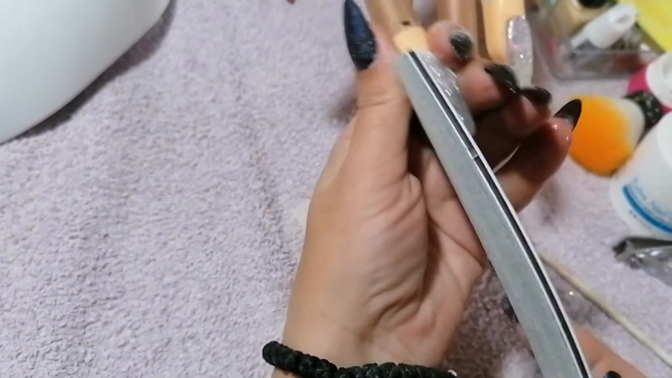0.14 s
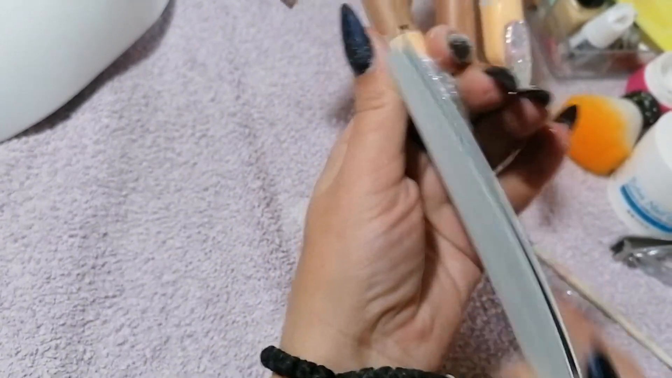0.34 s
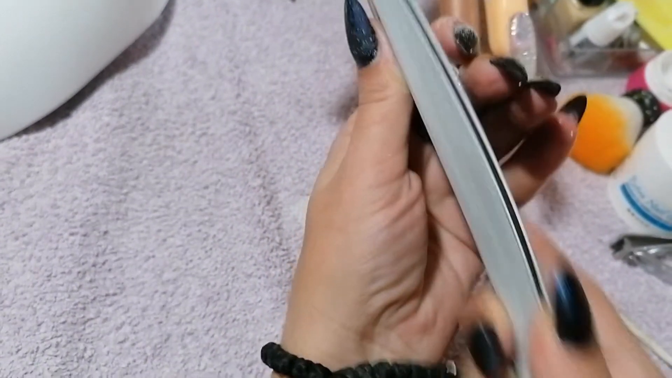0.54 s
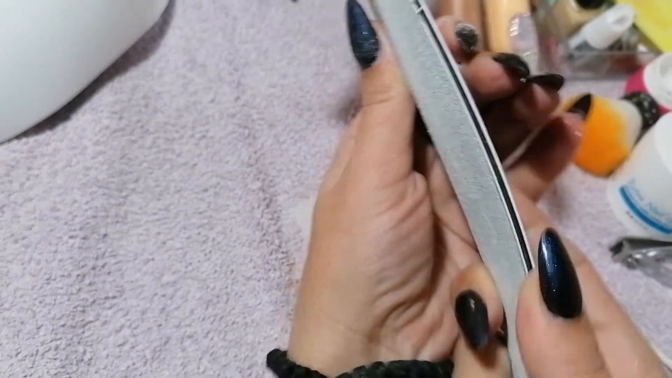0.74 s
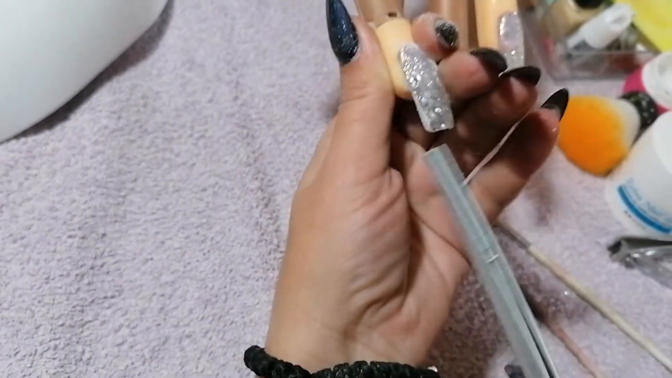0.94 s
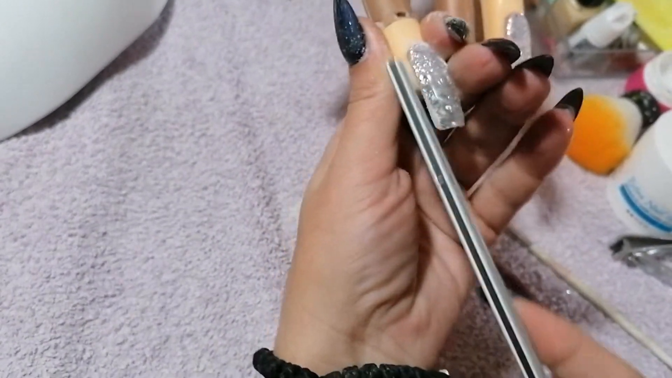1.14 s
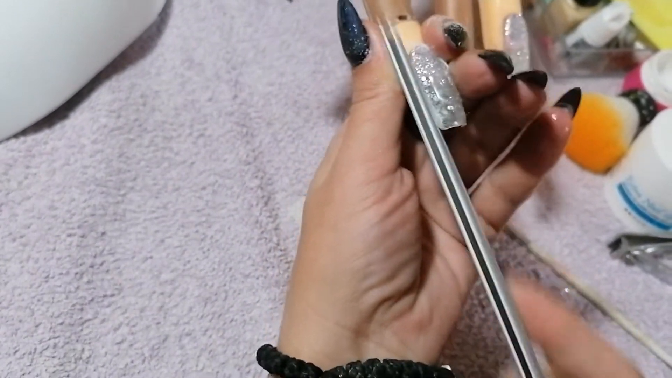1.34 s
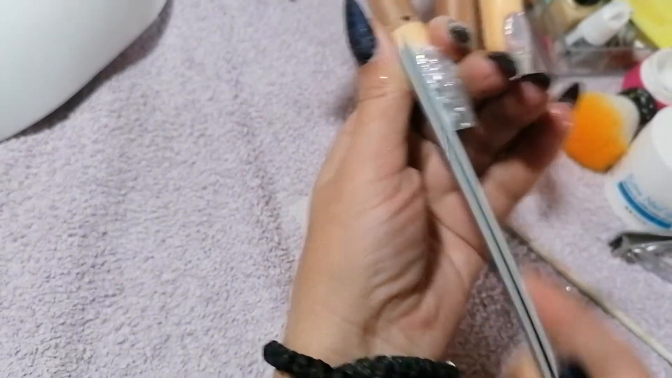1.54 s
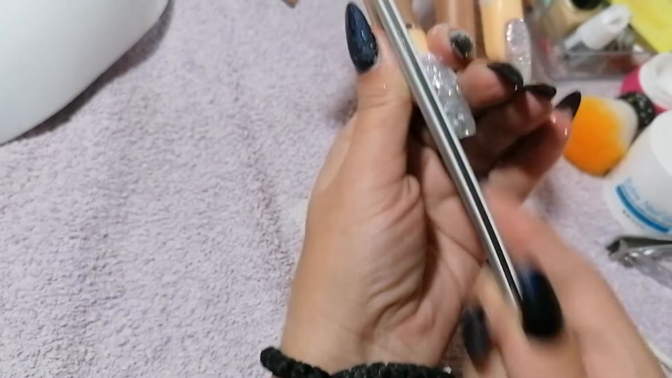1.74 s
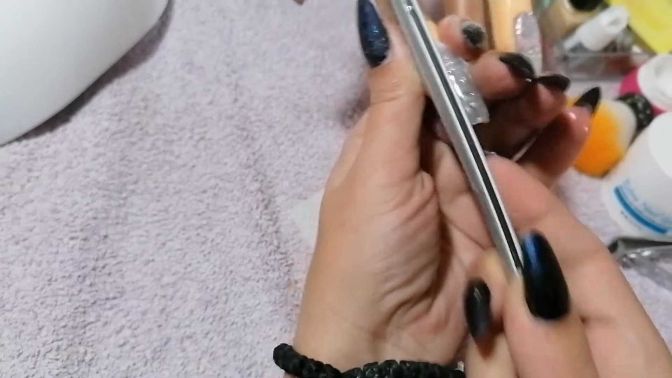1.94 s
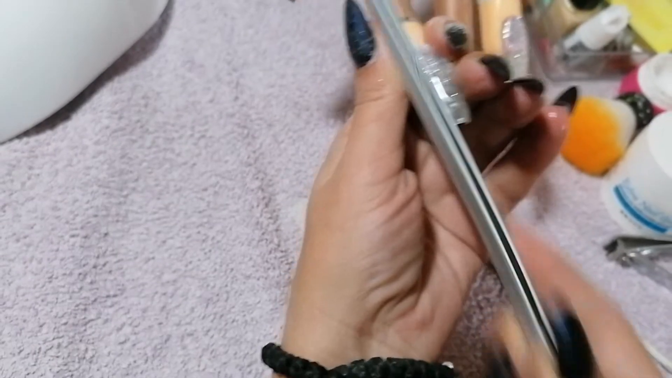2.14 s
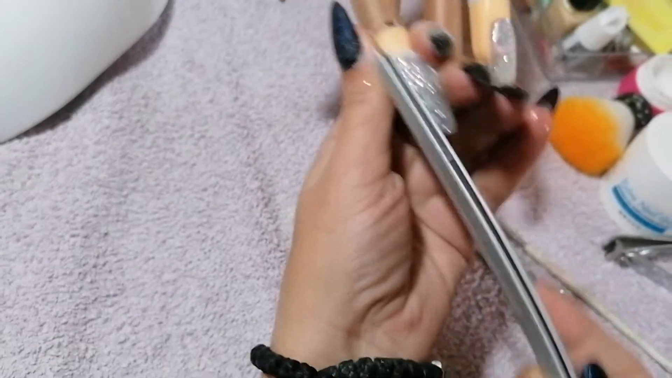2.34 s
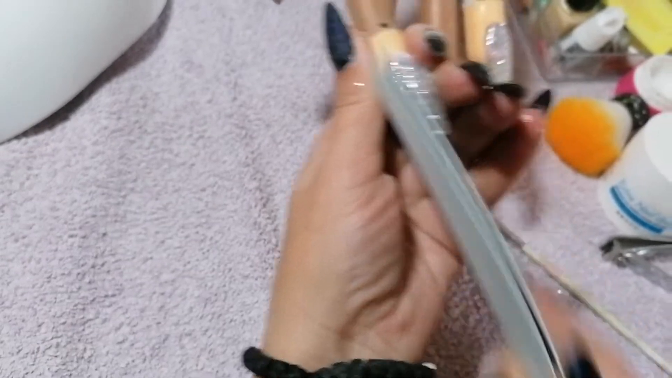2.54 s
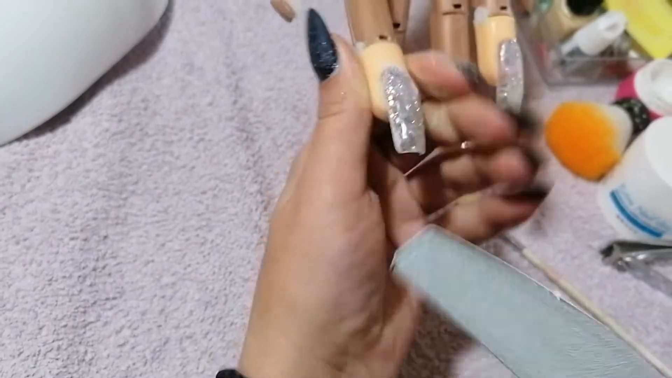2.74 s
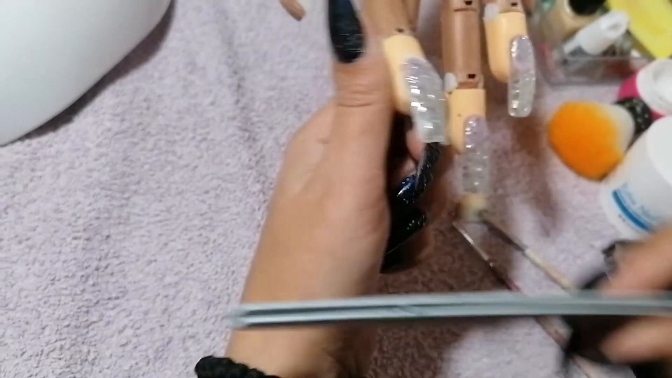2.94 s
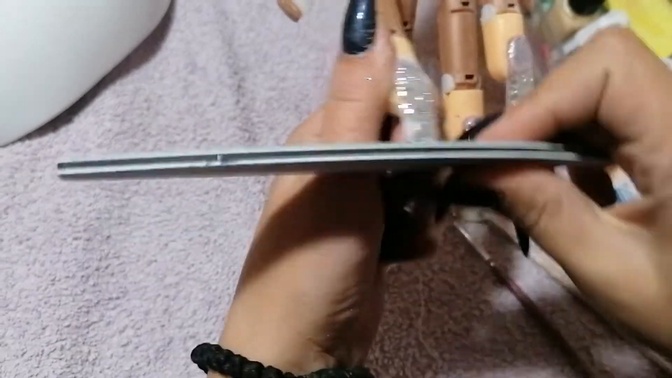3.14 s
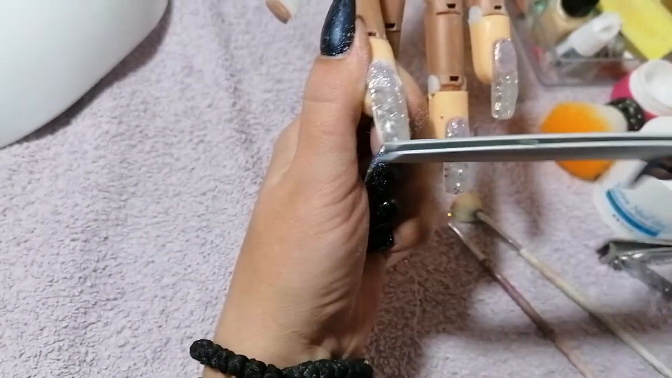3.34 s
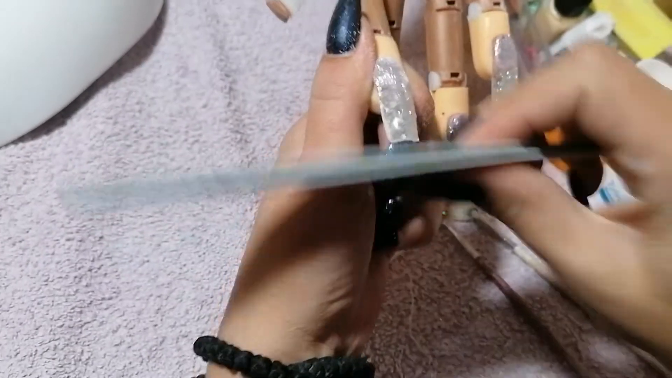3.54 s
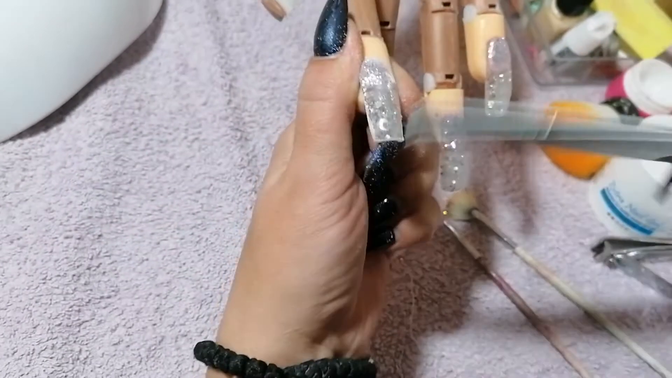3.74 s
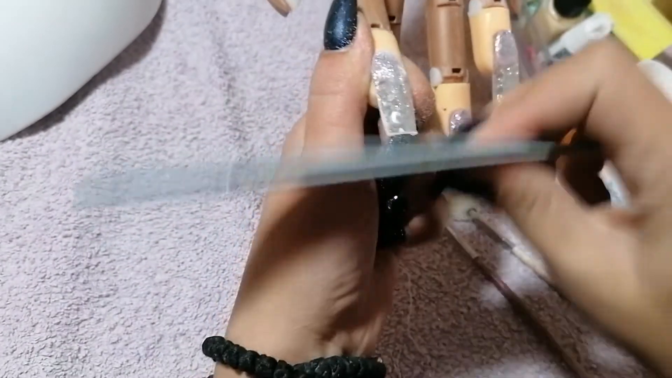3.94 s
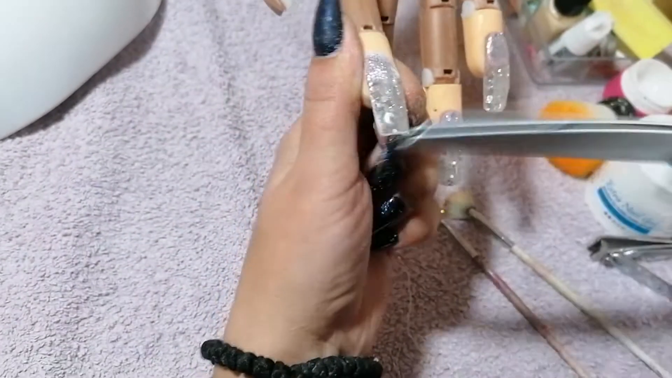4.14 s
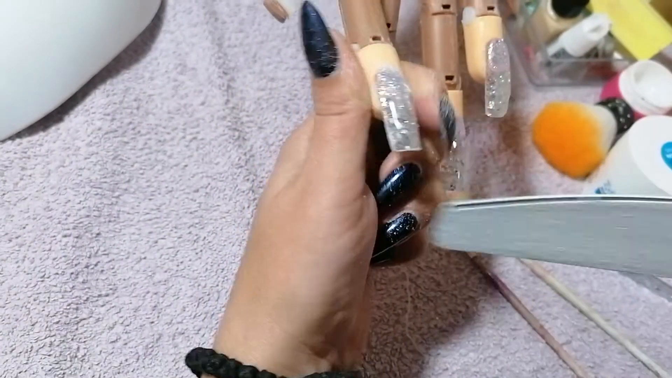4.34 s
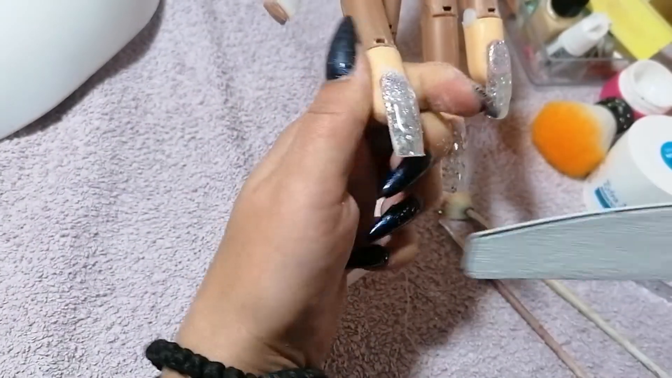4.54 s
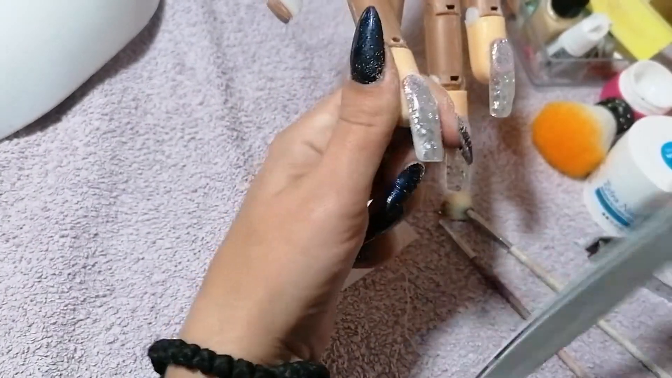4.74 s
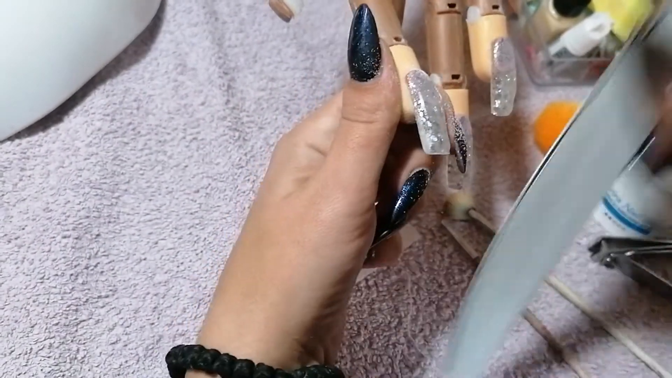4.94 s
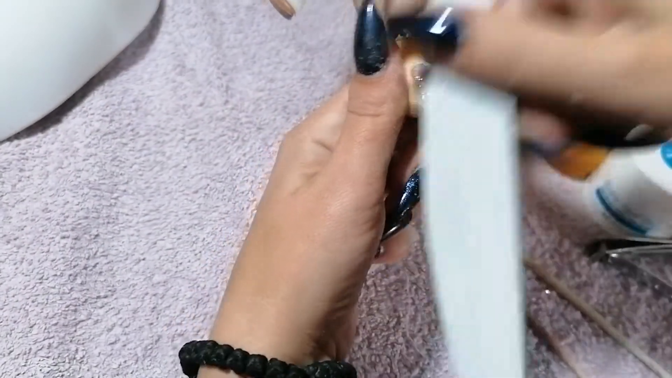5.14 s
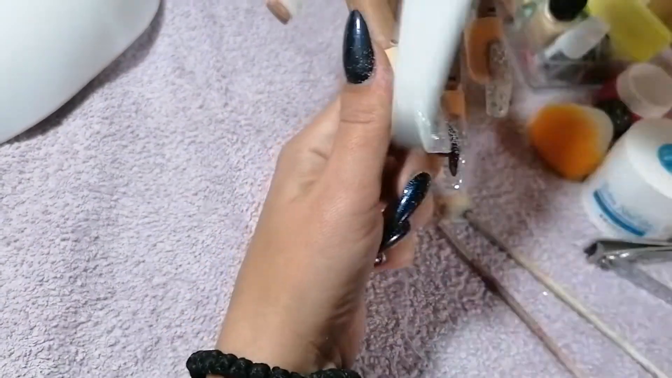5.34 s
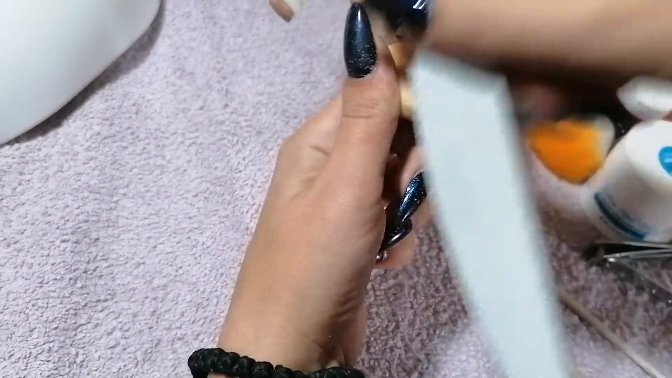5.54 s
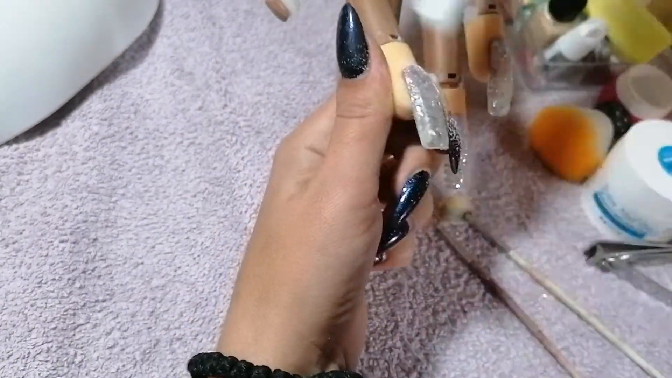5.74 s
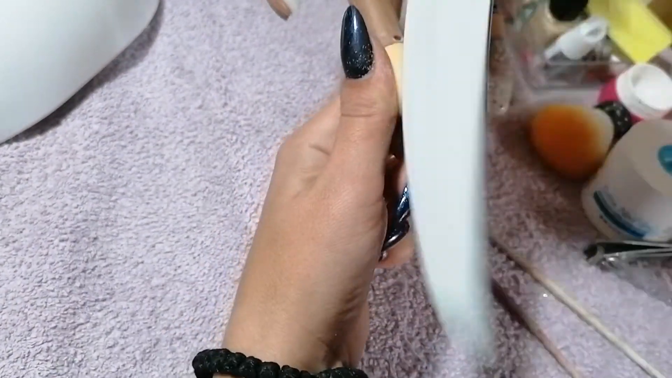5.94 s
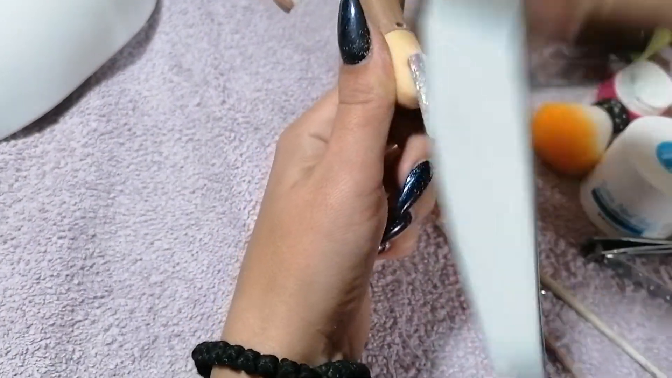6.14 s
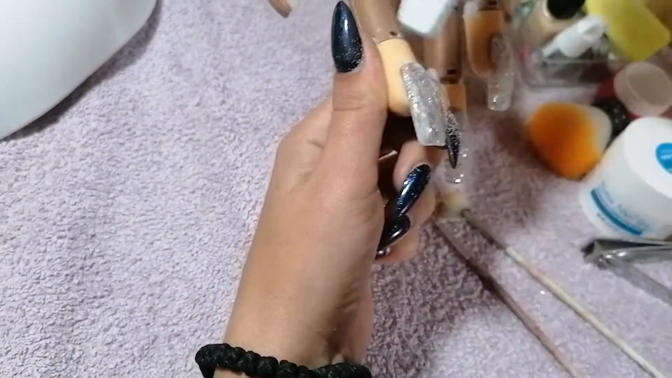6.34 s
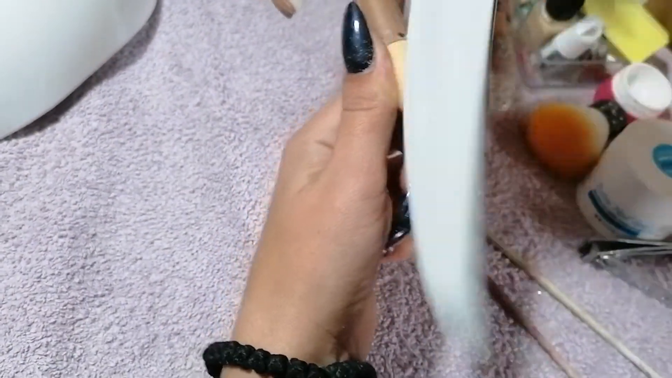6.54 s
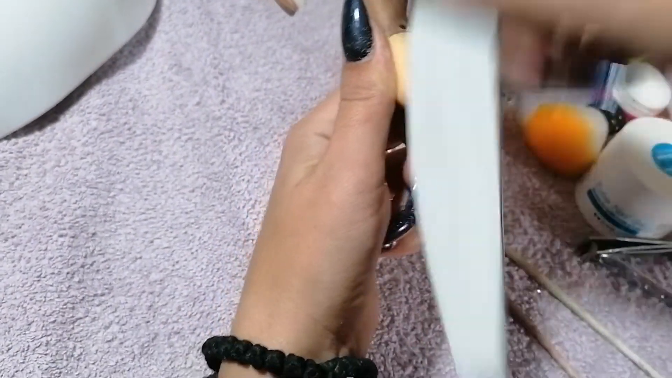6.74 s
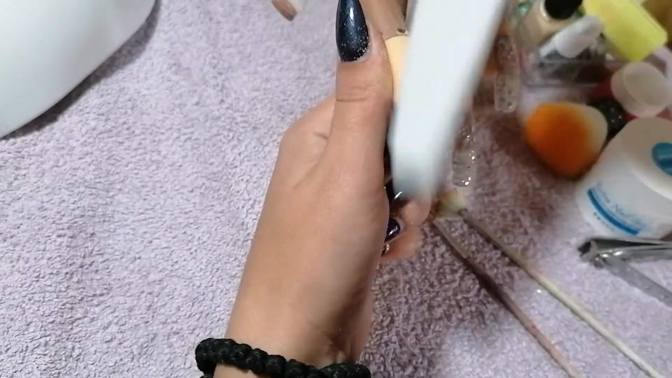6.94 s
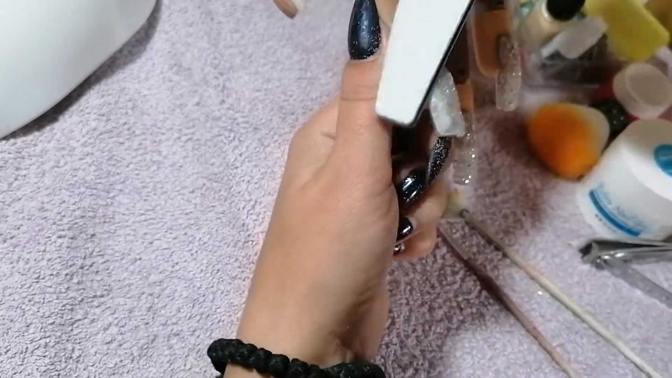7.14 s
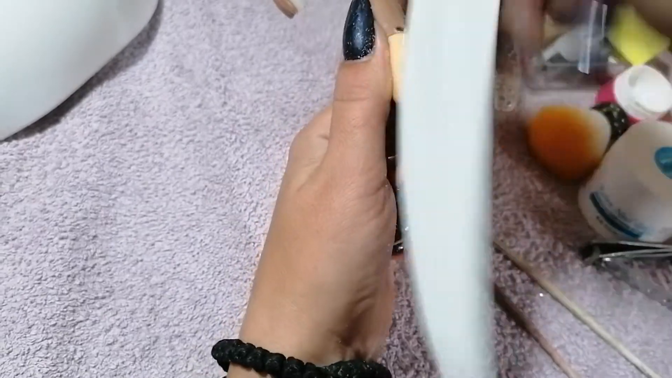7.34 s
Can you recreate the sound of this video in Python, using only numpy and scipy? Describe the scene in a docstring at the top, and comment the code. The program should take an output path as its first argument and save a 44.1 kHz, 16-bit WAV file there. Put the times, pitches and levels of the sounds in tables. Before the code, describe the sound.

Close at a towel-covered work table indoors, an emery file makes short, dry rasps on artificial nails, entirely on the right. A quick irregular cluster comes first, then more strokes, a couple of firm scrapes at the tip, and sparser scratches later. Faint brushing and small nail clicks fill the gaps. Low handling rumble, a few padded table knocks and a quiet steady room hush sit in the middle.

```python
"""At a towel-covered work table in a furnished room, an emery file rasps over artificial nails in short strokes.
The file works one side of a nail, its tip, then the far side; random grain impacts excite file and nail resonances.
Between strokes file and fingers brush lightly (sparser grains) and nails click (decaying modes with a noise snap).
Scraping, brushing and clicking are heard on the right. Dull knocks (low table modes), handling rumble (low noise
that follows the hands) and the room's hush (steady shaped noise) sit in or near the middle."""
import sys
import numpy as np
from scipy import signal
from scipy.fft import rfft, irfft, next_fast_len
from scipy.io import wavfile
from scipy.ndimage import uniform_filter1d, map_coordinates

SR = 44100
rng = np.random.default_rng(int(sys.argv[2]) if len(sys.argv) > 2 else 0)


def waveform_to_disk(signal):
    """Save audio, clipped to [-1, 1], as 16-bit WAV at the path in sys.argv[1]."""
    frames = np.transpose(np.atleast_2d(signal))
    scaled = np.clip(frames, -1, 1) * 32767
    samples = np.round(scaled).astype(np.int16)
    wavfile.write(sys.argv[1], SR, samples)


N = 326538  # samples, about 7.4 s


def amp(db):
    """Logarithmic level: decibels to linear gain."""
    return 10 ** (np.asarray(db) / 20)


def unit(x):
    """Normalization: x scaled to rms 1."""
    return x / np.sqrt(np.mean(x ** 2) + 1e-20)


def along(points, hz):
    """Interpolation on a logarithmic frequency axis through points (frequency [Hz], value)."""
    f, v = np.transpose(points)
    return np.interp(np.log(hz + 1), np.log(f + 1), v)


def coloured(x, curve):
    """Linear filtering in the frequency domain: curve gives the gain [dB] at each frequency [Hz]."""
    n = x.shape[-1]
    padded = next_fast_len(n + SR // 10)
    gain = amp(curve(np.fft.rfftfreq(padded, 1 / SR)))
    return irfft(rfft(x, padded) * gain, padded)[..., :n]


def wobble(n, rate):
    """Slow random modulation: a smooth curve of n samples through `rate` random knots a second."""
    knots = rng.standard_normal(int(n * rate / SR) + 4)
    return map_coordinates(knots, [np.arange(n) * rate / SR])


def ease(u):
    """Raised-sine transition: a smooth step from 0 to 1."""
    return np.sin(np.pi / 2 * np.clip(u, 0, 1)) ** 2


def add(track, s, sound):
    """Superposition: mix a sound into the track at time s [s]."""
    part = track[max(0, round(s * SR)):][:len(sound)]
    part += sound[:len(part)]


# Spectrum of the room's background: (frequency [Hz], relative density [dB])
HUSH_SPECTRUM = [(40, -16.5), (130, -14), (280, -15.5), (400, -14), (600, -15), (1050, -18), (1480, -18),
                 (1650, -20.5), (2180, -20), (4290, -26.5), (5780, -28.5), (8430, -38.5), (11000, -46.5),
                 (15000, -44.5)]


def hush():
    """Stationary noise: the steady, dull background of the room is shaped white noise."""
    air = unit(coloured(rng.standard_normal(N), lambda hz: along(HUSH_SPECTRUM, hz)))
    return air * amp(-72.0 + 0.065 * wobble(N, rate=11))


def shake(spectrum):
    """Level equalization: low noise divided by its own short-term rms, so its strength is even."""
    noise = coloured(rng.standard_normal(N), lambda hz: along(spectrum, hz))
    return noise / np.sqrt(np.abs(uniform_filter1d(noise ** 2, size=3000)) + 1e-12)


# Spectrum of the swaying table: (frequency [Hz], relative density [dB])
SWAY_SPECTRUM = [(8, -38), (18, 10), (45, -0.5), (70, -10), (100, -22), (200, -68.5)]
# Spectrum of rubbing on the towel: (frequency [Hz], relative density [dB])
RUB_SPECTRUM = [(45, -24), (80, -1), (110, -6.5), (170, -9.5), (230, -14), (295, -13.5), (370, -24.5),
                (700, -37), (2000, -93)]
# Movements of the hands: (time [s], length [s], sway level before trim [dB], rub level before trim [dB])
MOVES = [(0.097, 0.42, -46.5, -66.5), (0.563, 0.039, -47.5, -69), (0.644, 0.042, -47, -69),
         (0.864, 0.13, -47, -68), (1.049, 0.059, -51, -68.5), (1.397, 0.032, -48.5, -76),
         (1.486, 0.031, -51.5, -67.5), (1.604, 0.71, -45, -66), (2.402, 0.15, -49.5, -68),
         (2.636, 0.1, -45, -67.5), (2.808, 0.086, -46, -68.5), (3.346, 0.051, -46.5, -72),
         (3.454, 0.076, -40, -68), (3.755, 0.035, -47.5, -67.5), (3.829, 0.065, -48.5, -66),
         (4.13, 0.19, -46, -68.5), (4.63, 0.12, -47, -70.5), (4.928, 0.052, -47.5, -66.5),
         (5.351, 0.16, -47, -66), (5.705, 0.073, -47.5, -68), (5.795, 0.17, -49, -71),
         (6.025, 0.077, -47, -64.5), (6.17, 0.049, -51.5, -67), (6.273, 0.022, -51, -75),
         (6.365, 0.13, -45, -66), (6.589, 0.16, -51, -70), (6.796, 0.061, -50, -71.5),
         (6.935, 0.19, -47.5, -67.5), (7.194, 0.19, -50, -69)]
MOVE_RISE_S, MOVE_FALL_S = 0.025, 0.034  # the hands gather speed before a movement and settle after it
REST_SWAY_DB, REST_RUB_DB = -65.5, -77.5  # hands held almost still
SWAY_TRIM_DB, RUB_TRIM_DB = -1.5, 0.5
UNEVEN_DB = -16.5  # part of the sway with opposite sign in the two ears, relative to the common part
SURGE_DB, SURGES_PER_S = 1.5, 18  # a movement comes in small pushes


def rumble():
    """Amplitude modulation: hand movements set the level of table sway and dull towel rub, in small lumps."""
    t = np.arange(N) / SR
    sway = np.full(N, amp(REST_SWAY_DB))
    rub = np.full(N, amp(REST_RUB_DB))
    for s, length, sway_db, rub_db in MOVES:
        gathering = ease(1 + (t - s) / MOVE_RISE_S)
        settling = ease(1 + (s + length - t) / MOVE_FALL_S)
        motion = gathering * settling
        sway = np.maximum(sway, amp(sway_db + SWAY_TRIM_DB) * motion)
        rub = np.maximum(rub, amp(rub_db + RUB_TRIM_DB) * motion)
    lumps = amp(2.17 * wobble(N, rate=50) + SURGE_DB * wobble(N, SURGES_PER_S))
    uneven = amp(UNEVEN_DB) * shake(SWAY_SPECTRUM) * np.array([[1], [-1]])
    return lumps * (sway * (shake(SWAY_SPECTRUM) + uneven) + rub * shake(RUB_SPECTRUM))


# Low modes of the table: (frequency [Hz], relative level [dB], 60 dB decay time [s])
THUD_MODES = [(231, -1, 0.07), (292, -1.5, 0.089), (635, -7, 0.036)]
# Brief modes of the contact: (multiple of the tap pitch, relative level [dB], 60 dB decay time [s])
TAP_MODES = [(1, -2, .005), (1.3, -7, 0.0027), (2.4, -16, 0.0021)]
# Dull knocks through the table: (time [s], relative thud level [dB], relative tap level [dB], tap pitch [Hz])
KNOCKS = [(0.092, -59, -70, 600), (1.5594, -48, -62, 500), (1.5678, -43.5, -26, 715),
          (3.242, -64, -80, 600), (3.399, -52, -27, 1070), (6.115, -54, -64, 500), (6.181, -66, -68, 500)]
TAP_RISE_S = 0.00078  # a padded contact takes a moment to press home


def knocks():
    """Modal decay: a soft bump excites a brief tap and a few low cycles of the table."""
    out, t = np.zeros(N), np.arange(SR // 5) / SR

    def mode(hz, db, t60):
        return amp(db - 60 * t / t60) * np.sin(2 * np.pi * hz * t)

    thud = sum(mode(*row) for row in THUD_MODES)
    for s, thud_db, tap_db, tap_hz in KNOCKS:
        tap = sum(mode(multiple * tap_hz, db, t60) for multiple, db, t60 in TAP_MODES)
        add(out, s, (amp(thud_db) * thud + amp(tap_db) * tap) * ease(t / TAP_RISE_S))
    # the deepest part and the treble are weakened, the upper middle is raised
    path = [(100, -21.5), (300, 1.0), (2500, 8.0), (4000, 3), (9000, -50)]
    return coloured(out, lambda hz: along(path, hz))


def grit(n, rate, spread_db):
    """Poisson impacts: abrasive grains strike at random moments, each sample with its own random force."""
    hits = rng.poisson(rate / SR, n)
    return np.sqrt(hits) * rng.standard_normal(n) * amp(spread_db * rng.standard_normal(n))


def scrape(grains, spectrum, peaks, body_db, bite_db, air_db, extra_hz, extra_db):
    """Source and resonator: grains ring file and nail; pressure and angle weight body, bite and air."""
    # each new grip retunes the resonances a little
    grip = 1 + .006 * rng.standard_normal()
    # (frequency [Hz], tilt [dB])
    lean = [(400, body_db), (1350, body_db), (2000, bite_db), (3000, bite_db),
            (4200, 0), (8500, 0), (11000, air_db)]
    # each sound has one further broad lift in its colour
    modes = [*peaks, (extra_hz, extra_hz / 2.1, extra_db)]

    def response(hz):
        lifts = sum(db / (1 + (2 * (hz - grip * centre) / width) ** 2) for centre, width, db in modes)
        return along(spectrum, hz) + lifts + along(lean, hz)

    return unit(coloured(grains, response))


# Modes of a tapped nail: (frequency [Hz], mean relative level [dB], 60 dB decay time [s])
NAIL_MODES = [(570, -9, 0.0083), (965, -15, 0.02), (1580, -12, 0.019), (2080, -4, 0.011),
              (2800, -22, 0.0078), (3480, -5, 0.0088), (3970, -10.5, 0.024), (4240, -8, 0.013),
              (6530, -18, 0.018), (8600, -18.5, 0.018)]
# A nail edge catches or taps: (time [s], relative ring level [dB], relative snap level [dB])
CLICKS = [(0.9637, -43, -55), (1.35, -72, -63), (1.5995, -57, -41), (1.6064, -40, -43),
          (2.6164, -53, -45.5), (2.816, -44.5, -65), (3.1158, -40, -50), (3.321, -48, -57),
          (5.295, -58, -47), (5.627, -50.5, -76), (6.1627, -64, -40.5), (6.3134, -32.5, -54),
          (6.3163, -30.5, -45), (6.458, -64, -49.5), (6.4654, -65, -41), (6.878, -42, -51.5)]


def clicks():
    """Impulsive excitation: a sharp noise snap and a brief modal ring of the nail, damped by the finger."""
    out, t = np.zeros(N), np.arange(SR // 20) / SR

    def nail_mode(hz, db, t60):
        # the soft fingertip unsettles the ring and blurs its modes
        cycles = hz * t + rng.random() + .06 * wobble(len(t), rate=300)
        return amp(db + rng.normal(0, 1.3) - 60 * t / t60) * np.sin(2 * np.pi * cycles)

    for s, ring_db, snap_db in CLICKS:
        ring = sum(nail_mode(*row) for row in NAIL_MODES)
        snap = scrape(rng.standard_normal(len(t)), SIDE_GRIT, SIDE_PEAKS,
                      body_db=-25, bite_db=-5, air_db=1, extra_hz=5700, extra_db=1.5)
        ring = amp(ring_db) * ring * ease(t / 0.00075)
        snap = amp(snap_db - 60 * t / 0.01) * snap
        add(out, s, ring + snap)
    return out


# What the grit excites in a light touch: (frequency [Hz], relative density [dB])
BRUSH_GRIT = [(60, 11), (200, -0.5), (450, -8.5), (900, -6.5), (1800, -13), (3500, -11), (6500, -13.5),
              (9800, -12.5), (11500, -14), (15000, -23.5)]
# Resonances in a light touch: (nominal frequency [Hz], width [Hz], lift [dB])
BRUSH_PEAKS = [(324, 23, 1.4), (1260, 430, 6.7), (2300, 500, 1.9), (4070, 210, 3.4), (5590, 120, 12),
               (9500, 870, 7.6)]
# Light brushes of file and fingers: (time [s], length [s], level before trim [dB], body [dB], air [dB])
BRUSHES = [(0.024, 0.033, -52.5, -0.5, -6), (0.541, 0.028, -57.5, 1.5, -6), (1.103, 0.032, -55.5, 6, -6),
           (1.145, 0.21, -68, 5.5, -3), (1.299, 0.17, -61.5, -2, -3), (2.761, 0.074, -54.5, -2.5, -4),
           (2.91, 0.029, -54.5, 3.5, -13), (2.959, 0.078, -56, 4, -8), (3.02, 0.024, -54, -16.5, -8),
           (3.049, 0.095, -62, -1, -10), (3.17, 0.16, -64, 3.5, -5), (3.299, 0.034, -62, 3, 8),
           (3.523, 0.27, -59.5, 6.5, -8), (3.707, 0.029, -60, 3, 6), (4.091, 0.038, -58, -5.5, 9.5),
           (4.321, 0.12, -59.5, -6.5, -1), (4.413, 0.03, -61.5, -9, 5), (4.445, 0.13, -67.5, 1, -4),
           (4.594, 0.063, -60.5, 6, -1), (4.943, 0.32, -66.5, 2, -3), (5.162, 0.14, -57, -11.5, -2),
           (5.198, 0.055, -48.5, -18.5, -1.5), (5.293, 0.041, -61, -2, -3), (5.505, 0.21, -63, 2, -3.5),
           (5.91, 0.04, -62, 8, -6), (6.485, 0.13, -62.5, -0.5, -3), (6.823, 0.054, -65.5, 4, -5),
           (6.874, 0.013, -55.5, -4, 5)]
BRUSH_BITE_DB = 5.5  # bite relative to body
FLUTTER_DB, FLUTTERS_PER_S = 0.1, 22.3  # a very slight, slower unevenness of the touch
# a brush lands anywhere: centre, random scatter and size of its extra broad lift
BRUSH_HZ, BRUSH_OCTAVES, BRUSH_LIFT_DB = 2410, 0.92, 3


def brushes():
    """Sparse excitation: a light touch meets fewer grains and slides unevenly."""
    out = np.zeros(N)
    for s, length, db, body_db, air_db in BRUSHES:
        t = np.arange(int(length * SR)) / SR
        slide_db = 2.3 * wobble(len(t), rate=107.6) + FLUTTER_DB * wobble(len(t), FLUTTERS_PER_S)
        grains = grit(len(t), rate=14000, spread_db=2.5) * amp(slide_db)
        touch = ease(t / (0.18 * length)) * ease((length - t) / (0.32 * length))
        extra_hz = BRUSH_HZ * 2 ** (BRUSH_OCTAVES * rng.standard_normal())
        colour = body_db, body_db + BRUSH_BITE_DB, air_db, extra_hz, BRUSH_LIFT_DB
        add(out, s, amp(db) * touch * scrape(grains, BRUSH_GRIT, BRUSH_PEAKS, *colour))
    return out


# What the grit excites on the near side of a nail: (frequency [Hz], relative density [dB])
SIDE_GRIT = [(60, -23), (200, -13.5), (450, -21.5), (900, -12.5), (1800, -20), (3500, -8.5), (6500, -10.5),
             (9800, -1), (11500, -11.5), (15000, -14)]
# The same at the tip: (frequency [Hz], relative density [dB])
TIP_GRIT = [(60, -30), (200, -8.5), (450, -10.5), (900, -6.5), (1800, -3.5), (3500, -7.5), (6500, 0.5),
            (9800, 3.5), (11500, -6.5), (15000, -4.5)]
# The same on the far side: (frequency [Hz], relative density [dB])
FAR_GRIT = [(60, 5.5), (200, -4.5), (450, -2), (900, -6), (1800, -2), (3500, -11), (6500, -4),
            (9800, -11.5), (11500, -4), (15000, -11)]
# Resonances of file and nail on the near side: (nominal frequency [Hz], width [Hz], lift [dB])
SIDE_PEAKS = [(308, 150, 8.5), (593, 170, 10.5), (860, 110, 11), (1053, 98, 7), (1356, 118, 13.5),
              (1585, 330, 13), (2083, 320, 13.5), (2390, 420, 10.5), (2893, 620, 13), (5450, 890, 8),
              (7140, 920, 8.5)]
# The same at the tip: (nominal frequency [Hz], width [Hz], lift [dB])
TIP_PEAKS = [(298, 20, 21.5), (528, 220, 12.4), (872, 100, 17.7), (1056, 160, 11), (1334, 290, 15.2),
             (2400, 93, 6.7), (2930, 1100, 9.3), (3940, 490, 11.7)]
# The same on the far side: (nominal frequency [Hz], width [Hz], lift [dB])
FAR_PEAKS = [(624, 160, 8.7), (903, 37, 12.5), (1116, 310, 6.4), (1640, 59, 4.7), (3010, 390, 11.3),
             (4080, 920, 12), (7530, 130, 6.6), (9480, 1100, 17)]
# Firm strokes: (time [s], length [s], level before trim [dB], body [dB], bite [dB], air [dB],
# nominal centre of one extra broad lift in the stroke's colour [Hz])
STROKES = [(0.228, 0.042, -40, -7, -1, 1.5, 440), (0.559, 0.05, -38.5, 0, 0.5, -0.5, 910),
           (0.588, 0.041, -40.5, 1, -6, 1, 2660), (0.625, 0.042, -40.5, 3, 4, -2, 610),
           (0.688, 0.11, -40.5, -3.5, 0.5, -0.5, 1200), (0.776, 0.034, -50.5, 8, 5, -5, 1060),
           (0.8, 0.06, -38.5, 1.5, -2, 0, 1870), (0.931, 0.062, -43, -4, 0.5, -2.5, 1220),
           (1.469, 0.031, -46.5, -1, 0.5, 3.5, 420), (1.506, 0.034, -42.5, -4, 0.5, 2.5, 667),
           (1.562, 0.052, -53.5, 18.5, 5, -5, 696), (1.591, 0.04, -45, 7, 5, -4, 10600),
           (1.723, 0.059, -41, 2.5, 0, 1, 900), (2.137, 0.033, -42, -6, 0.5, -1, 1050),
           (2.258, 0.061, -38.5, -0.5, -5.5, 1.5, 2770), (2.371, 0.04, -42.5, -8.5, 2.5, 3.5, 1070),
           (2.395, 0.046, -41, -5.5, -2, 2, 1460), (2.527, 0.035, -40, 0, -1, 2.5, 1190),
           (2.594, 0.043, -58.5, 12, 8.5, 2, 525), (3.357, 0.038, -45.5, -5, -1.5, -7, 1260),
           (3.397, 0.09, -37.5, 2, 2.5, 0.5, 5660), (3.778, 0.042, -35, 1.5, 0.5, 1.5, 6150),
           (5.333, 0.041, -54.5, -6.5, -1.5, -10, 895), (5.721, 0.028, -43.5, 1.5, -1, -6, 1790),
           (5.767, 0.072, -40.5, -1.5, -1, -0.5, 1400), (6.057, 0.033, -41, -4, -8, -6.5, 900),
           (6.137, 0.041, -44, 7, 5, 8.5, 7750), (6.445, 0.034, -51.5, 3, -1, 6, 2900),
           (7.32, 0.032, -55.5, 2, -3, -1, 8000)]
TIP_FROM_S, FAR_FROM_S = 3, 5  # the file moves on to the tip, then to the far side
RISE_S, FALL_S = .02, 0.022  # the file bears down (at the usual level), the file lifts
RISE_GROWS, USUAL_DB = 0.19, -43.5  # a stroke firmer than usual takes longer to bear down [dB per dB]
EXTRA_LIFT_DB = 6.5  # size of the extra broad lift


def strokes():
    """Friction excitation: grain noise swells as the file bears down, chatters slightly and stops as it lifts."""
    out = np.zeros(N)
    for s, length, db, *colour in STROKES:
        t = np.arange(int(length * SR)) / SR
        if s < TIP_FROM_S:
            place = SIDE_GRIT, SIDE_PEAKS
        elif s < FAR_FROM_S:
            place = TIP_GRIT, TIP_PEAKS
        else:
            place = FAR_GRIT, FAR_PEAKS
        chatter = amp(1.1 * wobble(len(t), rate=700))
        grains = grit(len(t), rate=90000, spread_db=1) * chatter
        rise = RISE_S * amp(RISE_GROWS * (db - USUAL_DB))
        pressure = ease(t / rise) * ease((length - t) / FALL_S)
        add(out, s, amp(db) * pressure * scrape(grains, *place, *colour, EXTRA_LIFT_DB))
    return out


# Reverberation of the furnished room: (frequency [Hz], 60 dB decay time [s])
ROOM_DECAY = [(300, 0.99), (3000, 0.42), (8000, 0.14), (15000, 0.13)]


def room(x, near_db, tail_db):
    """Convolution: jars and table reflect within a few milliseconds; the furnished room answers faintly."""
    near = np.zeros(SR // 2)
    near[rng.integers(SR // 700, SR // 160, size=8)] = rng.choice([-1, 1], size=8)
    # the tail is noise that dies away at its own rate in each frequency band
    hz, t, bands = signal.stft(rng.standard_normal(SR // 2), SR, nperseg=256)
    decay = amp(-60 * t / along(ROOM_DECAY, hz)[:, None])
    tail = signal.istft(bands * decay, SR, nperseg=256)[1][:SR // 2]
    answer = amp(near_db) * near / np.linalg.norm(near) + amp(tail_db) * tail / np.linalg.norm(tail)
    return x + signal.fftconvolve(x, answer)[:N]


def scene():
    """Superposition: scraping, brushing and clicking on the right; knocks, rumble and hush alike in both ears,
    but for a small uneven part of the rumble."""
    touches = amp(0.62) * strokes() + amp(-2.86) * brushes() + clicks()
    filing = room(touches, near_db=-14, tail_db=-28.5)
    return np.array([amp(-55) * filing, filing]) + knocks() + rumble() + hush()


TOP_HZ = 15150  # start of the treble cut


def record(dry):
    """Band limitation: the gain falls smoothly by 80 dB over the 1500 Hz above the limit."""
    return coloured(dry, lambda hz: -80 * ease((hz - TOP_HZ) / 1500))


dry = scene()
out = record(dry)
waveform_to_disk(out)
```